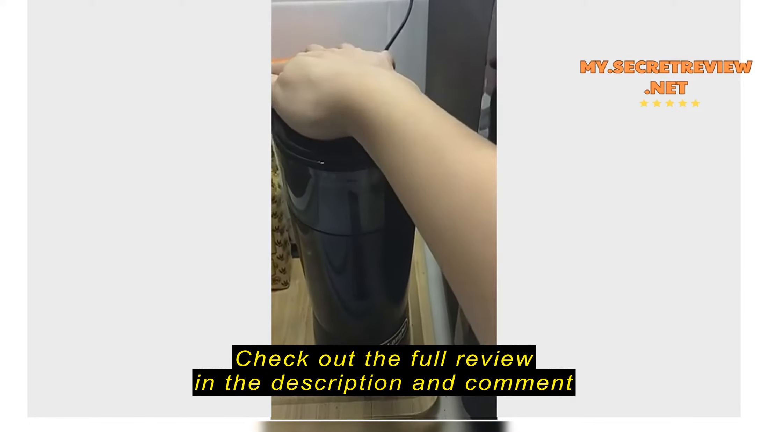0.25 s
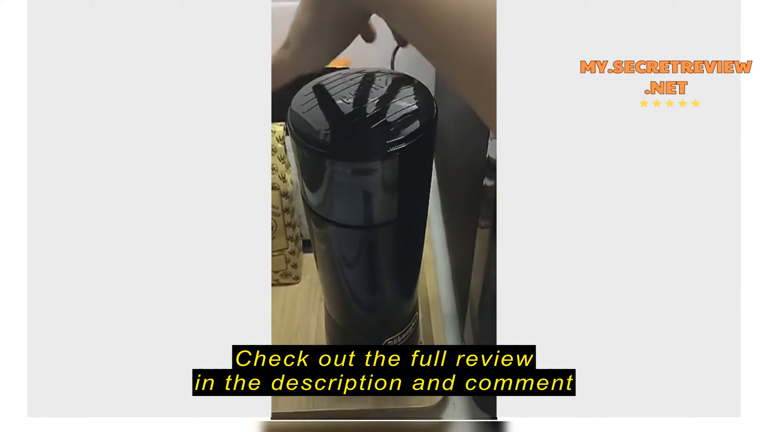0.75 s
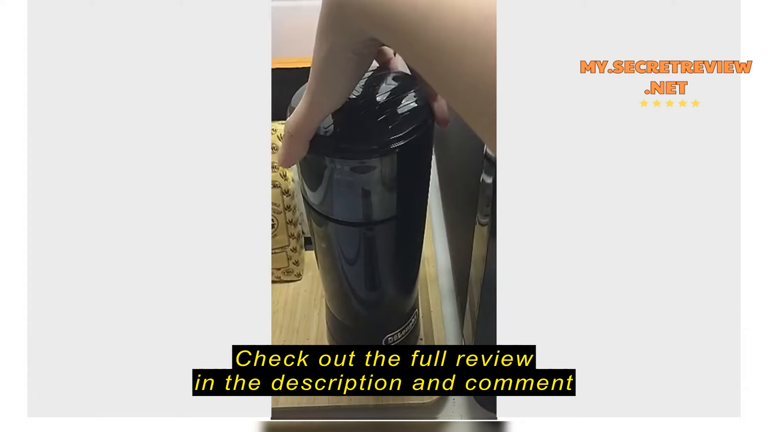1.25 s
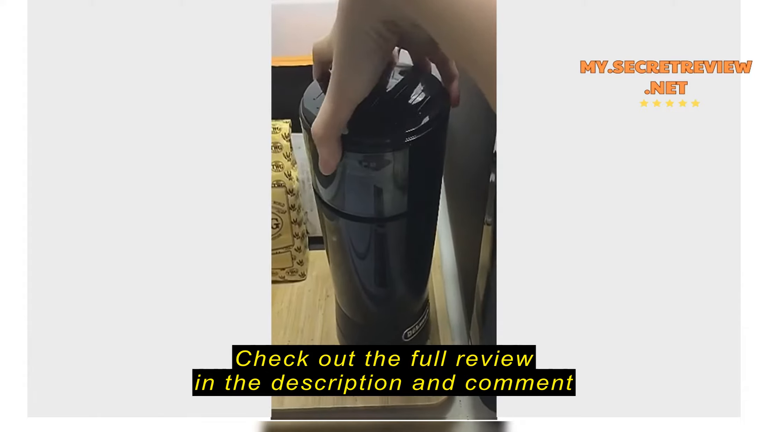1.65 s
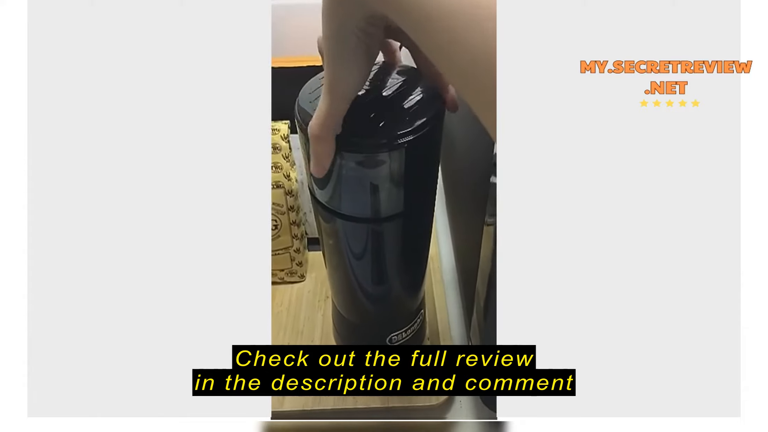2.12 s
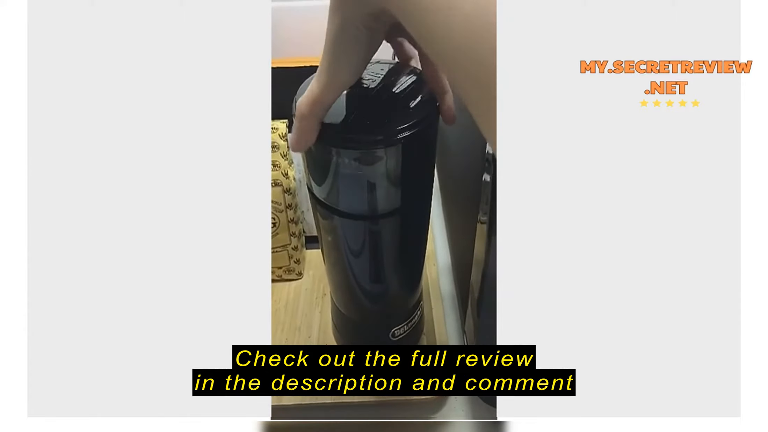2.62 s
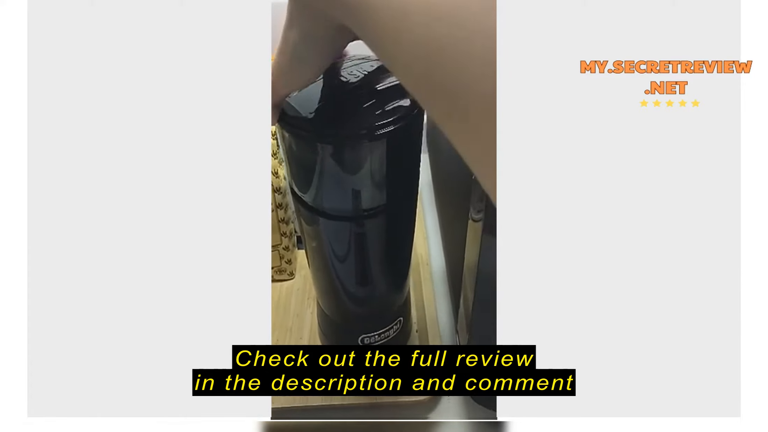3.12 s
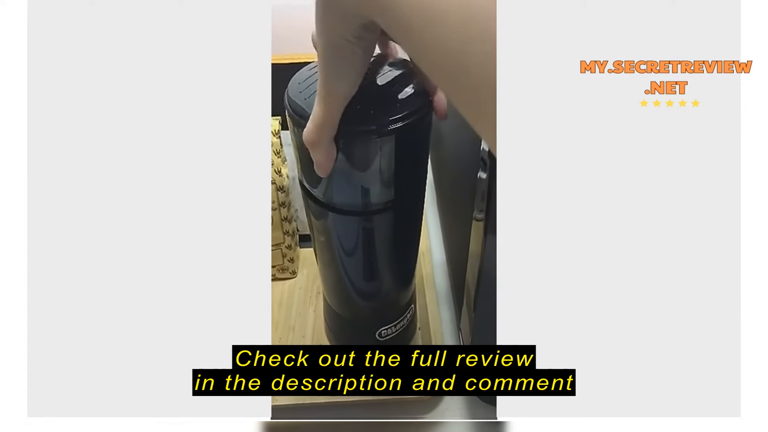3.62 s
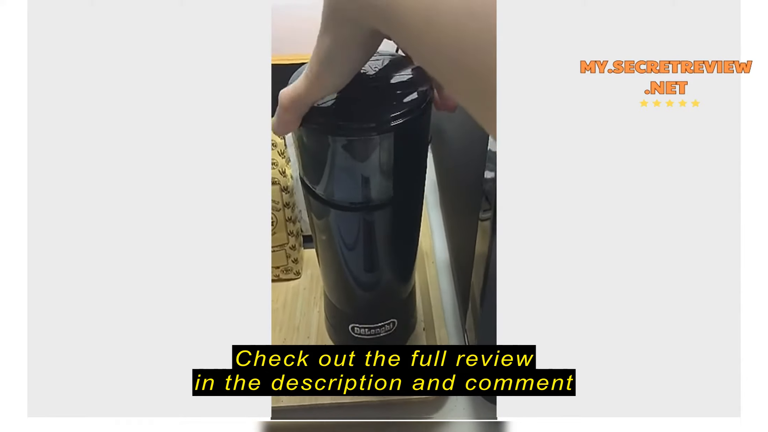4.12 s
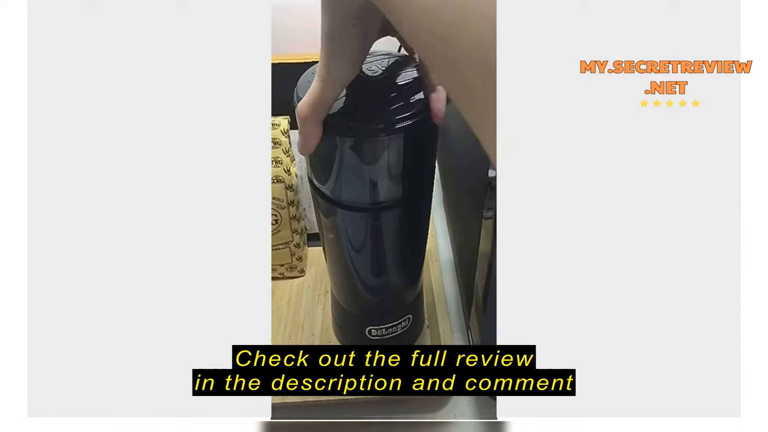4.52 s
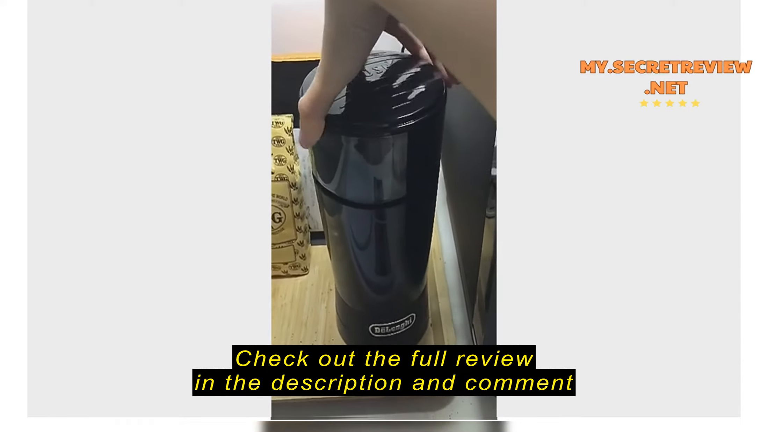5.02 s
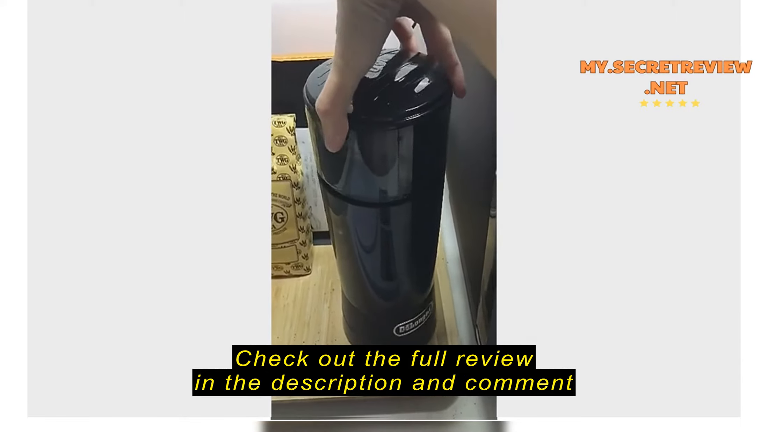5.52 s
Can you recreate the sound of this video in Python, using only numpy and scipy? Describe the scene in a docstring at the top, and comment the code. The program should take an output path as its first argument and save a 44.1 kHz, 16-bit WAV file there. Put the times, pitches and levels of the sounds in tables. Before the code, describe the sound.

A quiet small kitchen with low air noise and a faint wavering mains hum, heard close by in mono. Faint lid touches at 0.1 and 0.3 seconds lead to a firm plastic clack at about 0.56, then a tight cluster of louder knocks from 0.78 to 0.9, with low bumps from the counter. A small finger slip comes at 1.4. At about 1.66 the electric grinder kicks with a jolt and hum surge, its whine climbing rapidly while beans crunch densely against the cup in a hollow roar. Power cuts near 2.33; the pitch falls steadily and pieces tumble, cracking more separately and duller until it stops around 3.1. From 3.4 onward the hand shifts its grip: quiet scrapes, nail taps near 4.1 and 4.3, soft low rocking thuds between 3.8 and 5.5, and the clearest brief scrape with a tap at about 5.45 to 5.5.

```python
"""Electric blade grinder on a counter

Heard from close by in a small kitchen: a hand seats the plastic lid and presses it, and the motor kicks,
whirls the beans round the cup and coasts down while the last pieces tumble. Then the grip shifts.
Motor and hum are sine tones, beans are random impacts in coloured noise, lid knocks are noise bursts
and decaying modes, skin is swelling noise, and the grinder's rocking is low, short tones."""
import sys
import numpy as np
from scipy import signal
from scipy.fft import rfft, irfft
from scipy.io import wavfile

SR = 44100
rng = np.random.default_rng(int(sys.argv[2]) if len(sys.argv) > 2 else 0)


def generate_wav(signal):
    """Clip the signal to [-1, 1] and save it as 16-bit WAV at the path in sys.argv[1]."""
    frames = np.transpose(np.atleast_2d(signal))
    scaled = np.clip(frames, -1, 1) * 32767
    pcm = np.round(scaled).astype(np.int16)
    wavfile.write(sys.argv[1], SR, pcm)


N = 253575
TIME = np.arange(N) / SR
MAINS_HZ = 50
MOTOR_ON_S, MOTOR_OFF_S = 1.658, 2.331


def from_db(db):
    """Logarithmic scale: decibels become an amplitude gain."""
    return 10 ** (np.asarray(db) / 20)


def rms_one(x):
    """Normalisation: scale to unit mean power."""
    return x / np.sqrt(np.mean(x ** 2) + 1e-20)


def drift(rate_hz):
    """Random modulation: chance values, rate_hz of them a second, joined by lines; spread 1."""
    knots = rng.standard_normal(8000)
    return rms_one(np.interp(TIME * rate_hz, np.arange(len(knots)), knots))


def colour(x, spectrum, resonances=(), size=8192):
    """Minimum-phase filtering: a smooth spectrum with resonant lifts, causal and of unit power gain."""
    hz = np.maximum(np.arange(size // 2 + 1) * SR / size, 1)
    points = np.array(spectrum)
    db = np.interp(np.log(hz), np.log(points[:, 0]), points[:, 1])
    for centre_hz, width_hz, lift_db in resonances:
        db = db + lift_db / (1 + (2 * (hz - centre_hz) / width_hz) ** 2)
    # folding the cepstrum onto positive times makes the filter causal
    cepstrum = irfft(np.log(rms_one(from_db(db))))
    cepstrum[1:size // 2] *= 2
    cepstrum[size // 2 + 1:] = 0
    impulse_response = irfft(np.exp(rfft(cepstrum)))
    return signal.fftconvolve(x, impulse_response)[:N]


def add(track, start_s, sound):
    """Superposition: mix a sound into the track at its start time."""
    start = max(round(start_s * SR), 0)
    track[start:start + len(sound)] += sound[:max(N - start, 0)]


def bursts(starts_s, levels_db, rise_s, t60):
    """Contact noise: each contact is a quick swell of tiny slips that dies away."""
    out, age = np.zeros(N), TIME[:SR // 5]
    shape = (1 - np.exp(-age / rise_s)) * from_db(-60 * age / t60)
    shape = shape / shape.max()
    for start_s, level_db in zip(starts_s, levels_db):
        add(out, start_s, from_db(level_db) * shape * rng.standard_normal(len(age)))
    return out


def struck(starts_s, levels_db, modes, press_s, detune):
    """Modal ringing: each blow excites decaying modes, shifted a little by the grip of the hand."""
    out, age = np.zeros(N), TIME[:SR // 2]
    for start_s, level_db in zip(starts_s, levels_db):
        ring = 0
        for pitch_hz, mode_db, t60 in modes:
            cycles = pitch_hz * rng.normal(1, detune) * age + rng.random()
            ring = ring + from_db(mode_db - 60 * age / t60) * np.sin(2 * np.pi * cycles)
        press = 1 - np.exp(-age / press_s)
        add(out, start_s, from_db(level_db) * press * ring)
    return out


def strokes(rows):
    """Gesture envelope: each movement of the hand swells and fades as a bell curve."""
    return sum(from_db(peak_db) * np.exp(-2 * np.pi * ((TIME - peak_s) / length_s) ** 2)
               for peak_s, peak_db, length_s in rows)


# Spectrum of the kitchen's noise: pitch_hz [Hz], level_db [dB, relative]
AIR_SPECTRUM = [(15, -45), (25, -33), (105, -1), (137, -11.5), (210, -16), (399, -25), (432, -30),
                (520, -28.5), (563, -29.5), (818, -31.5), (1290, -35), (2250, -37.5), (2640, -42.5),
                (2940, -45), (14500, -73.5)]


def kitchen(air_db=-51.5, hum_db=-58, waver_db=2.5):
    """Stationary background: low coloured noise and a wavering hum at twice the mains frequency."""
    air = from_db(air_db) * colour(rng.standard_normal(N), AIR_SPECTRUM)
    hum = from_db(hum_db + waver_db * drift(7.7)) * np.sin(2 * np.pi * 2 * MAINS_HZ * TIME)
    return air + hum


# Palm rubbing over the lid: peak_s [s], peak_db [dB], length_s [s]
PALM_RUBS = [(0.1, -75, .2), (0.56, -58.5, 0.088), (0.77, -60.5, 0.074), (1.58, -66, 0.18),
             (3.62, -74, 0.43), (4.1, -68, 0.34)]
# Spectrum of the rubbing: pitch_hz [Hz], level_db [dB, relative]
RUB_SPECTRUM = [(150, -11.5), (300, -2), (700, -11.5), (1400, -11), (2800, -17.5), (5000, -20), (9000, -27),
                (14500, -29.5)]


def palm(resting_db=-75, grain_db=4.5):
    """Sliding friction: skin on plastic gives grainy noise that grows with each stroke."""
    pressure = from_db(resting_db) + strokes(PALM_RUBS)
    grain = from_db(grain_db * drift(120))
    return colour(rng.standard_normal(N) * pressure * grain, RUB_SPECTRUM)


# The grinder rocks on the counter: start_s [s], level_db [dB], pitch_hz [Hz]
ROCKING_BUMPS = [(0.567, -37, 102.6), (0.794, -34, 99), (0.905, -38, 154), (1.612, -51.5, 250),
                 (3.014, -36, 275), (3.764, -38.5, 98.2), (3.971, -39, 83), (4.11, -39.5, 88),
                 (4.184, -32.5, 83.5), (4.258, -39.5, 85.5), (4.337, -34, 82.2), (4.808, -40.5, 91),
                 (5.064, -36.5, 93), (5.105, -32.5, 79), (5.532, -32.5, 88.3)]


def bumps(swell_s=0.012, overtone_db=-13):
    """Soft support: the rubber feet give way, so each low thud swells and fades in a few cycles."""
    out, age = np.zeros(N), TIME[:SR // 4]
    swell = age / swell_s * np.exp(1 - age / swell_s)
    for start_s, level_db, pitch_hz in ROCKING_BUMPS:
        fundamental = np.sin(2 * np.pi * pitch_hz * age)
        overtone = from_db(overtone_db) * np.sin(2 * np.pi * (2 * pitch_hz * age + rng.random()))
        add(out, start_s, from_db(level_db) * swell * (fundamental + overtone))
    return out


# Fingers slipping on the lid: peak_s [s], peak_db [dB, relative], length_s [s]
FINGER_SLIPS = [(0.29, -70.5, 0.15), (0.545, -64, 0.027), (1.44, -57.5, 0.026), (3.25, -63, .013),
                (3.391, -60, 0.038), (3.416, -56.5, 0.019), (3.485, -66, 0.071), (4.283, -58, 0.036),
                (4.33, -65.5, 0.04), (4.753, -55.5, 0.057), (4.839, -66, .011), (5.071, -52, 0.022),
                (5.32, -61.5, 0.059), (5.437, -52.5, 0.0087), (5.456, -45, 0.013), (5.472, -46.5, 0.017)]
# Spectrum of the scrape: pitch_hz [Hz], level_db [dB, relative]
SCRAPE_SPECTRUM = [(600, -0.5), (1500, -6.5), (2800, -2), (4200, -5.5), (6000, -2), (8000, -5.5),
                   (10000, -6.5), (11200, -5), (13000, -5), (14500, -16)]
# Resonances of cup and lid, shared by the sources below: pitch_hz [Hz], width_hz [Hz], lift_db [dB]
CUP_RESONANCES = [(294, 190, 6), (475, 150, -0.5), (610, 39, 8.5), (770, 68, 6.5), (899, 45, 4),
                  (1180, 92, 5.5), (1315, 40, 3.5), (1420, 130, 5.5), (1590, 32, 3), (1830, 210, 2),
                  (1948, 45, 3), (2686, 340, 5), (3256, 39, 6), (3830, 90, 7), (4137, 200, 7),
                  (4460, 49, 8), (4870, 42, -4.5), (5510, 44, 1.5), (6090, 710, 5.5), (6980, 74, 8.5),
                  (8370, 100, 8), (9500, 640, 4.5), (12600, 2500, 4)]


def slips(level_db=-1.0, grain_db=4.0):
    """Stick-slip friction: skin sticks and slides, a short grainy scrape that swells and fades."""
    grain = from_db(level_db + grain_db * drift(600))
    scrape = strokes(FINGER_SLIPS) * grain * rng.standard_normal(N)
    return colour(scrape, SCRAPE_SPECTRUM, CUP_RESONANCES)


# A fingernail tapping the lid: start_s [s], level_db [dB]
FINGERNAIL_TAPS = [(4.085, -52.5), (4.127, -47), (4.278, -50.5), (4.744, -52), (5.469, -54), (5.511, -44)]
# Spectrum of a tap: pitch_hz [Hz], level_db [dB, relative]
NAIL_SPECTRUM = [(900, -18), (1700, -3.5), (2200, -5.5), (2750, -4), (3700, -12), (4800, -12.5),
                 (6500, -23.5), (13000, -43)]


def nail():
    """Hard, small contact: it reaches only the upper ring of the lid."""
    taps = bursts(*np.transpose(FINGERNAIL_TAPS), rise_s=0.0006, t60=0.022)
    return colour(taps, NAIL_SPECTRUM, CUP_RESONANCES)


# Knocks on the lid: start_s [s], level_db [dB], hardness [0 flat of the hand to 1 bare rim]
LID_KNOCKS = [(0.112, -56.5, 1), (0.333, -48.5, 0.41), (.564, -31, 0.39), (0.6, -51, 0.77),
              (.623, -52.5, .15), (.698, -65.5, 0.91), (.72, -42, .25), (.785, -27.5, 0.11),
              (0.788, -38, 0.67), (.837, -27.5, 0.53), (.846, -38, 0.63), (.888, -40, 0.45),
              (.894, -33, 0.74), (3.386, -48.5, 0.3), (3.513, -52, 0.32), (3.587, -60.5, 0.71),
              (4.276, -52.5, .25), (4.322, -54.5, 0.29), (4.765, -50.5, 0.18), (5.066, -52.5, .1),
              (5.094, -52, 0.93), (5.644, -53.5, 0.31)]
# Spectrum of the shell: pitch_hz [Hz], level_db [dB, relative]
SHELL_SPECTRUM = [(250, -2.5), (480, 3.5), (680, -7.5), (1050, 1), (1300, -6), (1600, 4), (2200, -6.5),
                  (4000, -20), (9000, -56)]
# Spectrum of the edge: pitch_hz [Hz], level_db [dB, relative]
EDGE_SPECTRUM = [(1200, -27), (2800, -2.5), (5000, 6.5), (7500, 2), (10000, 3.5), (11200, -2.5), (13000, 4),
                 (14500, -9.5)]
# Ringing modes of the shell: pitch_hz [Hz], level_db [dB, relative], t60_s [s]
SHELL_RING = [(1035, -1.5, .08), (1340, -15.5, 0.2), (1626, -0.5, 0.073), (1730, -9, 0.027),
              (2024, -13, 0.12), (2493, 0, 0.024), (4680, -9.5, 0.044)]
# Modes of the hollow body: pitch_hz [Hz], level_db [dB, relative], t60_s [s]
BODY_MODES = [(164.5, -7.5, 0.13), (268, 0.5, 0.048), (327, -5, 0.028), (458, -12.5, 0.031)]


def lid(ring_db=-7.0, edge_db=-26.0, edge_hard_db=37.0, body_db=-31.0, body_hard_db=-18.0,
        body_growth=0.62, light_db=-50):
    """Impact hardness: a harder contact clicks more at the edge and knocks less in the hollow body."""
    starts_s, levels_db, hardness = np.transpose(LID_KNOCKS)
    edge_levels = levels_db + edge_db + edge_hard_db * hardness
    # the body's knock grows more slowly than the blow
    body_levels = body_db + body_growth * (levels_db - light_db) + body_hard_db * hardness
    clack = colour(bursts(starts_s, levels_db, rise_s=0.0006, t60=0.046), SHELL_SPECTRUM, CUP_RESONANCES)
    click = colour(bursts(starts_s, edge_levels, rise_s=0.0033, t60=0.022), EDGE_SPECTRUM, CUP_RESONANCES)
    ring = struck(starts_s, levels_db + ring_db, SHELL_RING, press_s=0.00045, detune=0.0087)
    knock = struck(starts_s, body_levels, BODY_MODES, press_s=0.0031, detune=0.017)
    return clack + click + ring + knock


def rotor_speed(free_speed_hz=504, half_speed_s=.086, brake_hz_per_s=538):
    """Torque and friction: the pull weakens with speed, then even braking; in turns per second."""
    driven_s = np.clip(TIME, MOTOR_ON_S, MOTOR_OFF_S) - MOTOR_ON_S
    coasting_s = np.maximum(TIME - MOTOR_OFF_S, 0)
    reached_hz = free_speed_hz * driven_s / (driven_s + half_speed_s)
    return np.maximum(reached_hz - brake_hz_per_s * coasting_s, 0)


# Tone of the unbalanced rotor: speed_hz [turns per s], level_db [dB, before the harmonic's own level]
ROTOR_UNBALANCE = [(60, -70), (180, -44), (260, -41), (335, -46), (385, -40), (445, -35.5)]
# First four harmonics of the rotor: level_db [dB, relative]
ROTOR_HARMONICS = [-0.5, -24.5, -15, -20.5]


def motor(speed, turns, inrush_db=-16, inrush_s=0.026, build_s=0.0174, hum_db=-51, wobble_db=2.5,
          rumble_db=-45):
    """Rotating unbalance and magnetic pull: tone once a turn, hum at twice the mains, hardest at first."""
    running = speed > 0
    powered = TIME < MOTOR_OFF_S
    tone = 0
    for order, level_db in enumerate(ROTOR_HARMONICS, start=1):
        tone = tone + from_db(level_db + wobble_db * drift(25.93)) * np.sin(2 * np.pi * order * turns)
    tone = tone * running * from_db(np.interp(speed, *np.transpose(ROTOR_UNBALANCE)))

    # the current surges while the rotor is still slow
    age = np.maximum(TIME - MOTOR_ON_S, 0)
    inrush = from_db(inrush_db) * np.exp(-age / inrush_s) * (1 - np.exp(-age / build_s))
    current = inrush + from_db(hum_db + 2.2 * drift(56)) * powered
    hum = current * np.sin(2 * np.pi * 2 * MAINS_HZ * age)

    jolt = bursts([MOTOR_ON_S], [-26], rise_s=.001, t60=0.26)
    kick = colour(jolt, [(90, -20), (270, -7.5), (700, -15.5), (1200, -21), (4000, -28.5)], CUP_RESONANCES)

    # the counter rumbles along, more weakly without power
    effort = np.sqrt(np.abs(speed) / speed.max())
    shake = running * np.where(powered, 1, .55) * effort * rng.standard_normal(N)
    rumble = from_db(rumble_db) * colour(
        shake, [(30, -30), (60, -6.5), (95, 6.5), (135, -2.5), (300, -20.0), (900, -46.5)])
    return tone + hum + kick + rumble


def crunch(per_s, size_db, grain_s):
    """Random impacts: pieces strike by chance, each a short burst of cracking; a power curve of mean 1."""
    sizes = from_db(size_db * np.minimum(rng.exponential(1, N), 4))
    strikes = rng.random(N) < per_s / SR
    energy = sizes ** 2 * strikes / per_s
    fade = np.exp(-1 / (grain_s * SR))
    power = signal.lfilter([1], [1, -2 * fade, fade ** 2], energy + 1e-18)
    return power / power.mean()


def hail(per_s, size_db=2.0, grain_s=0.00062, own_share=0.5, count=9):
    """Partly coherent bands: each piece has its own pitch, so bands crunch partly alone; unit power."""
    shared, own = crunch(per_s, size_db, grain_s), np.clip(own_share, 0, 1)
    edges_hz = np.concatenate([[0], np.geomspace(500, 11500, count - 1), [SR]])
    white, hz = rfft(rng.standard_normal(N)), np.arange(N // 2 + 1) * SR / N
    out = 0
    for low, high in zip(edges_hz, edges_hz[1:]):
        band = irfft(white * (hz >= low) * (hz < high), N)
        power = (1 - own) * shared + own * crunch(per_s / 2, size_db, 2 * grain_s)
        out = out + band * np.sqrt(power)
    return out


def hollow(flying, speed, flying_hz=1402, sunk_hz=1742, width_hz=380, level_db=-7, rise=.15, wander_hz=45):
    """Cavity resonance: stirred air roars in one broad band, higher with speed and as the beans sink."""
    effort = speed / speed.max()
    centre_hz = flying * flying_hz * effort ** rise + (1 - flying) * sunk_hz + wander_hz * drift(14)
    phase = 2 * np.pi * np.cumsum(centre_hz) / SR
    # two random quadratures make a noise band around the centre
    air = (drift(width_hz) * np.sin(phase) + drift(width_hz) * np.cos(phase)) / np.sqrt(2)
    return from_db(level_db) * effort * air   # level against the whirl at top speed


# Whole beans cracking on blade and wall: start_s [s], level_db [dB, relative]
BEAN_CRACKS = [(1.787, -20), (1.807, -16.5), (2.003, -25), (2.156, -21.5), (2.228, -21), (2.253, -23.5),
               (2.595, -20.5), (2.635, -17.5), (2.673, -18), (2.726, -20), (2.754, -24.5), (2.82, -20.5),
               (2.874, -22), (2.935, -30), (2.984, -27), (3.014, -18.5), (3.097, -29)]
# Spectrum of beans flung by the fast blade: pitch_hz [Hz], level_db [dB, relative]
FLUNG_SPECTRUM = [(100, -29.5), (205, -19.5), (330, -4.5), (420, -7.5), (500, -11), (620, -6.5), (700, -10),
                  (850, -5.5), (1060, -14), (1320, -4.5), (2200, -10.5), (4400, -11.5), (6500, -16),
                  (10500, -25), (14500, -27.5)]
# Spectrum of beans tumbling at low speed: pitch_hz [Hz], level_db [dB, relative]
TUMBLING_SPECTRUM = [(100, -8.5), (260, -2.5), (560, -6.5), (680, -14), (840, -1.5), (1020, -10),
                     (1650, -2.5), (2250, -10), (4200, -8.5), (7000, -12), (9500, -11.5), (10600, -21.5),
                     (12700, -8), (14500, -27)]


def beans(speed, turns, whirl_db=-30.5, whirl_growth=0.24, hits_per_turn=1.5, least_per_s=400,
          clump_db=0.7, swirl=0.13, flung_db=-0.5, tumbling_db=-3.0, hit_db=-7.0, settle_s=0.11,
          stall_speed=25, rolling_speed=70, rolling_hz=5500):
    """Granular impacts: the blade flings pieces at the cup; without power they sink and tumble, fewer."""
    per_s = least_per_s + hits_per_turn * speed
    clumps = from_db(whirl_db + clump_db * drift(110))
    # loudness follows a power of the speed and vanishes as the blade stalls
    level = clumps * (speed / speed.max()) ** whirl_growth * np.tanh(speed / stall_speed)
    stream = level * hail(per_s) * (1 + swirl * np.sin(2 * np.pi * turns))
    starts_s, levels_db = np.transpose(BEAN_CRACKS)
    hits = bursts(starts_s, levels_db + hit_db, rise_s=0.0027, t60=0.043)

    flying = np.exp(-np.maximum(TIME - MOTOR_OFF_S, 0) / settle_s)
    flung = colour(flying * (from_db(flung_db) * stream + hits), FLUNG_SPECTRUM, CUP_RESONANCES)
    sunk = (1 - flying) * (from_db(tumbling_db) * stream + hits)
    tumbling = colour(sunk, TUMBLING_SPECTRUM, CUP_RESONANCES)
    # an almost stopped blade only rolls the pieces, which sounds duller
    rolling = np.clip(2 * (1 - speed / rolling_speed) + .5, 0, 1)
    dull = signal.sosfilt(signal.butter(1, rolling_hz, fs=SR, output="sos"), tumbling)
    tumbling = (1 - rolling) * tumbling + rolling * dull
    return flung + tumbling + level * hollow(flying, speed)


def scatter(x, t60, build_s):
    """Diffuse reverberation: a dense tail of reflections with unit energy."""
    age = TIME[:SR * 3 // 4]
    tail = rng.standard_normal(len(age)) * (1 - np.exp(-age / build_s)) * from_db(-60 * age / t60)
    return signal.fftconvolve(x, tail / np.linalg.norm(tail))[:N]


# Spectrum of the room's reflections: pitch_hz [Hz], level_db [dB, relative]
ROOM_SPECTRUM = [(60, -4.5), (200, 1.5), (1500, -2.5), (6000, -2), (14000, -3)]


def room(contacts, level_db=-12.5):
    """Room response: the small kitchen returns a coloured, decaying tail of the contacts."""
    return from_db(level_db) * colour(scatter(contacts, t60=0.35, build_s=0.0015), ROOM_SPECTRUM)


def scene():
    """Superposition at one point: grinder, hand and room reach one microphone."""
    speed = rotor_speed()
    # the load of the beans makes the blade's speed waver a little
    turns = np.cumsum(speed * (1 + 0.0012 * drift(50.8))) / SR
    contacts = slips() + nail() + lid() + beans(speed, turns)
    mono = kitchen() + palm() + bumps() + room(contacts) + motor(speed, turns) + contacts
    return np.array([mono, mono])


def record(dry, low_hz=50.3, cutoff_hz=14350):
    """Band limiting: the microphone loses the deep bass, and the top is cut steeply."""
    thin = signal.sosfilt(signal.butter(1, low_hz, "high", fs=SR, output="sos"), dry)
    return signal.sosfilt(signal.ellip(10, .2, 70, cutoff_hz, fs=SR, output="sos"), thin)


dry = scene()
out = record(dry)
generate_wav(out)
```